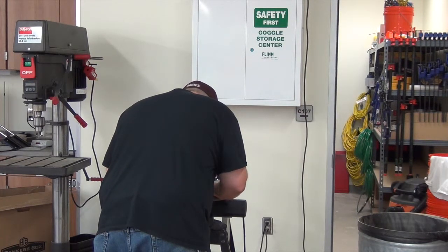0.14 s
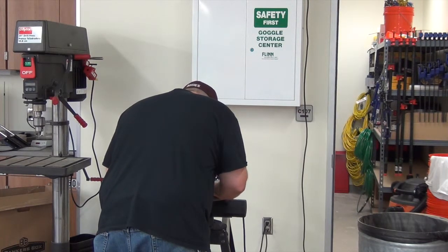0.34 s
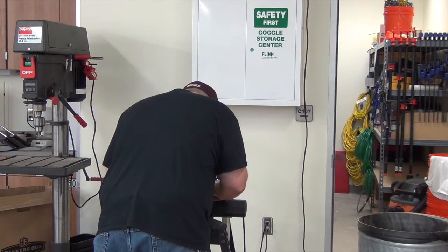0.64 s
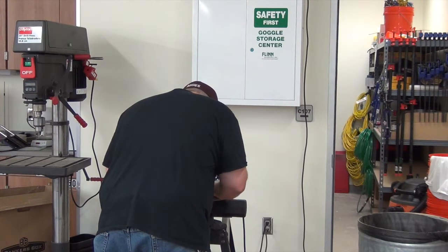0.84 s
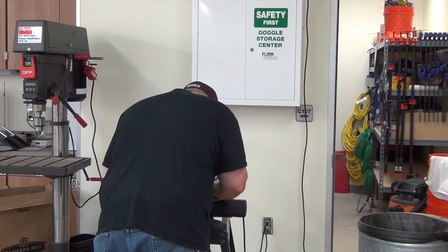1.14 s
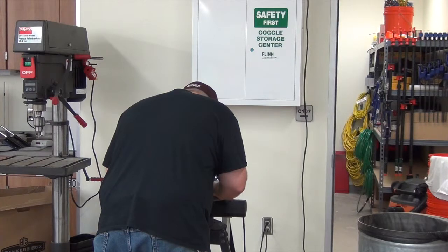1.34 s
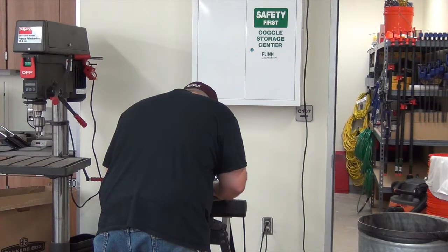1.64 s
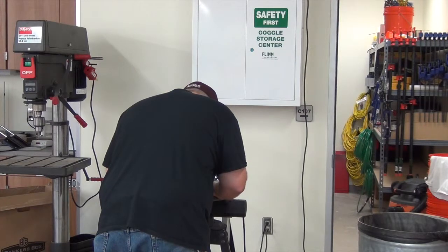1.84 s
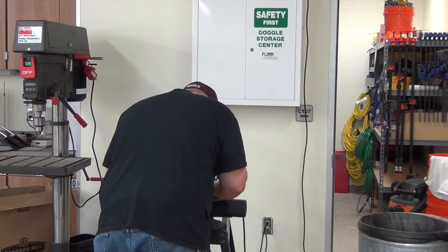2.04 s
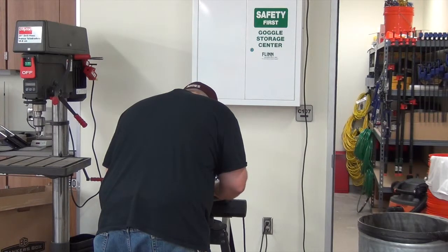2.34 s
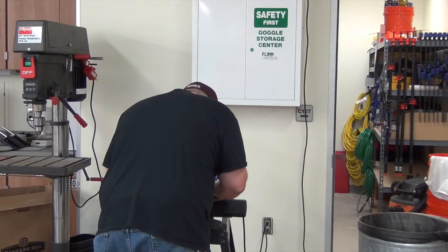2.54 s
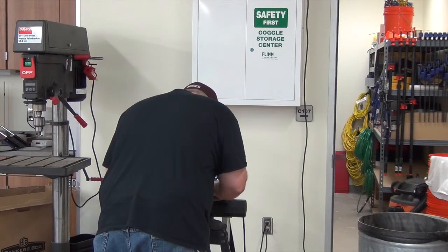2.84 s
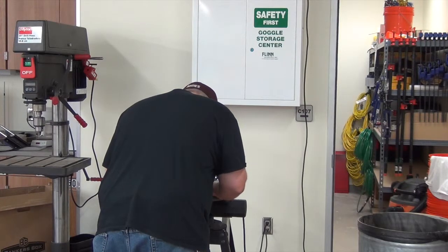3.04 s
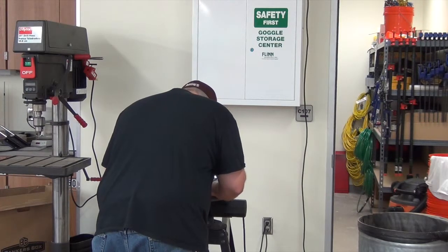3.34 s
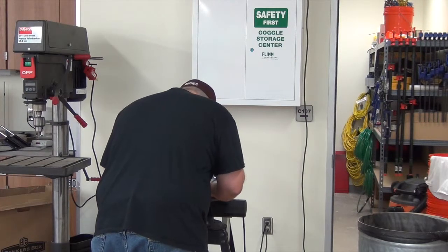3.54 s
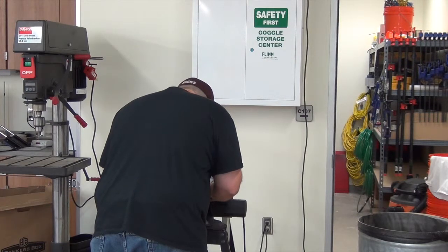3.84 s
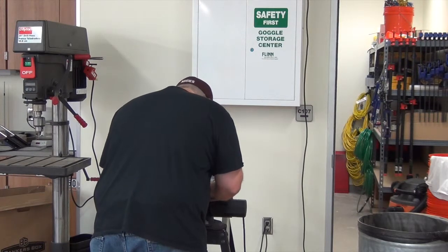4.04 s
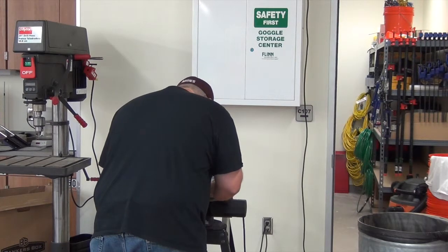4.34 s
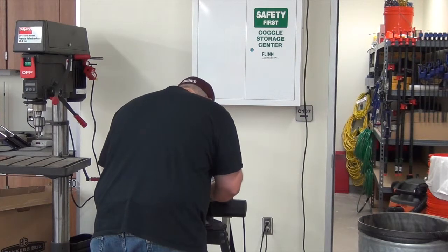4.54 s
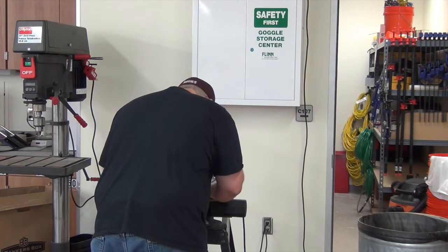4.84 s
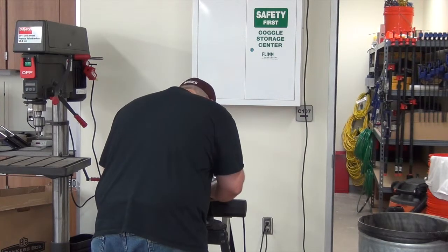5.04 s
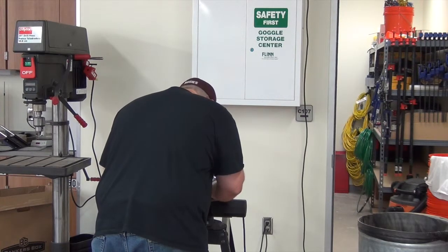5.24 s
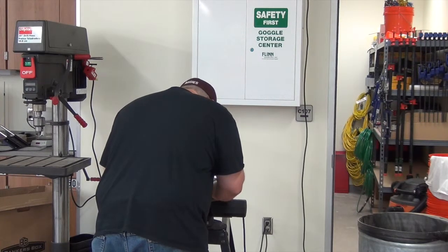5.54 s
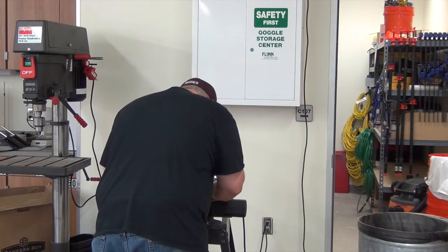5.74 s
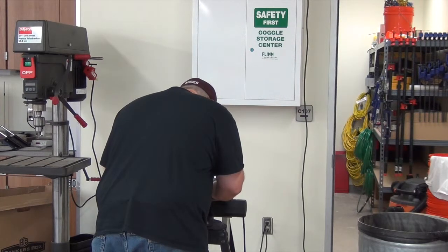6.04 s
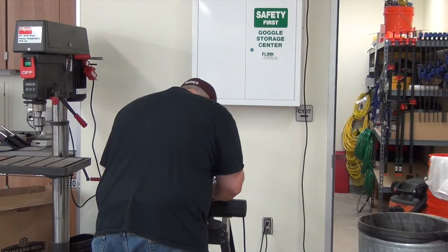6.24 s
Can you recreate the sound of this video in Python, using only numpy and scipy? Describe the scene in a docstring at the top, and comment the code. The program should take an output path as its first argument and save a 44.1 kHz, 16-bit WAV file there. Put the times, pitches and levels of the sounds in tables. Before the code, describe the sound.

A scroll saw rasps and squeaks through wood, runs free with a rattling hum, then bites into a harsher second cut.

```python
"""First you hear a scroll saw rasping through wood in a workshop, at about 24 strokes a second.
Its teeth click against the wood and set it ringing. The blade judders, squeaks and grabs the piece,
making it chatter on the table, then eases off and comes free. The motor hums and the linkage that
drives the blade rattles on alone, until the teeth bite into a second, harsher cut."""
import sys
import numpy as np
from scipy import signal
from scipy.fft import rfft, irfft, next_fast_len
from scipy.io import wavfile
from scipy.ndimage import uniform_filter1d, minimum_filter1d

SR = 44100
rng = np.random.default_rng(int(sys.argv[2]) if len(sys.argv) > 2 else 0)


def wav_out(sig):
    """Save sig, one row per channel (or a flat mono array), as 16-bit PCM at SR to the path in sys.argv[1]."""
    wavfile.write(sys.argv[1], SR, np.round(np.clip(np.atleast_2d(sig).T, -1, 1) * 32767).astype(np.int16))


N = 281358
TIME_S = np.arange(N) / SR
STROKES_PER_S = 24.2
FREE_S, BITE_S = 3.68, 5.338  # the first cut ends, the second begins
USUAL_FEED_DB, IDLE_FEED_DB = -28.5, -60.5  # feed is how hard the wood is pushed into the blade
CUT_PAN_DB, TABLE_PAN_DB = .6, 1.3  # how much louder on the left


def from_db(db):
    """Turn decibels into a gain to multiply by."""
    return 10 ** (np.asarray(db) / 20)

def rms(x):
    """The average strength of a sound (root mean square)."""
    return np.sqrt(np.mean(x ** 2) + 1e-20)

def in_time(rows):
    """Join timed points with straight lines, one curve per column."""
    times_s, *columns = np.transpose(rows)
    return [np.interp(TIME_S, times_s, column) for column in columns]

def spells(rows, attack_s, release_s):
    """A gain for events that build up, hold and die away."""
    gains = []
    for start_s, hold_s, db in rows:
        fade = np.minimum((TIME_S - start_s) / attack_s, (start_s + hold_s - TIME_S) / release_s)
        gains.append(from_db(db) * np.exp(np.clip(fade, -np.log(1e9), 0)))
    return np.max(gains, axis=0)

def follow(feed_db, usual_db, share):
    """A gain of usual_db at the usual feed, taking a share of every change in the feed."""
    return from_db(usual_db + share * (feed_db - USUAL_FEED_DB))

def band(x, low_hz, high_hz):
    """Keep the sound between two pitches."""
    return signal.sosfilt(signal.butter(4, [low_hz, high_hz], "band", fs=SR, output="sos"), x + 1e-18)

def coloured(x, points):
    """Shape a sound's lows and highs with a smooth curve; strength 1."""
    hz, db = np.transpose(points)
    size = next_fast_len(N + SR // 10)
    octave = np.log2(np.fft.rfftfreq(size, 1 / SR) + 1)
    bass_cut_db = np.minimum(octave - np.log2(hz[0]), 0) * 24
    gain = from_db(np.interp(octave, np.log2(hz), db) + bass_cut_db)
    y = irfft(rfft(x, size) * gain, size)[:N]
    return y / rms(y)

def resonate(x, modes):
    """Ring an object's natural notes (modes); narrow ones ring longer. Strength 1."""
    y = 0
    for k, (hz, width_hz, db) in enumerate(modes):
        r = np.exp(-np.pi * width_hz / SR)
        feedback = [1, -2 * r * np.cos(2 * np.pi * hz / SR), r * r]
        y = y + (-1) ** k * from_db(db) * (1 - r * r) * signal.lfilter([1, 0, -1], feedback, x + 1e-18)
    return y / rms(y)

def contacts(turns, angles, sizes, jitter_s=.00004):
    """Clicks at the same points of every crank turn, each a little early or late."""
    when = np.interp(np.arange(len(sizes))[:, None] + angles, turns, np.arange(N), -SR, -SR)
    at = np.round(when + jitter_s * SR * rng.standard_normal(when.shape)).astype(int)
    inside = (at >= 0) & (at < N)
    return np.bincount(at[inside], sizes[inside], N)

def rattle(turns, count, alike, spread_db, jitter_s=.00004):
    """Many small clicks a turn, whose sizes partly repeat from stroke to stroke; strength 1."""
    shape = (int(turns[-1]) + 2, count)
    sizes = np.sqrt(alike) * rng.choice([-1, 1], count) + np.sqrt(1 - alike) * rng.standard_normal(shape)
    angles = (np.arange(count) + rng.random(count)) / count - 1 / 2
    clicks = contacts(turns, angles, sizes * from_db(spread_db * rng.standard_normal(shape)), jitter_s)
    return clicks / rms(clicks)

def stroke(turns, swing_db, return_db, lag, uneven_db):
    """A gain that pulses once a stroke (swing) and twice a stroke (return); lag is in turns."""
    angle = 2 * np.pi * (turns - lag)
    count = int(turns[-1]) + 2
    grip = np.interp(turns - lag, np.arange(count), rng.standard_normal(count))
    gain = from_db(swing_db * np.cos(angle) + return_db * np.cos(2 * angle))
    power = uniform_filter1d(gain ** 2, int(SR / STROKES_PER_S))
    return gain / np.sqrt(power) * from_db(uneven_db * grip)

def workshop(x, pan_db, echo_db, fade_s=.27, width_db=-23):
    """The direct sound plus a dying swarm of echoes, nearly alike left and right."""
    t = np.arange(SR // 2) / SR
    tails = rng.standard_normal((2, len(t))) * from_db(-60 * t / fade_s) * (t > .003)
    common, apart = from_db(echo_db) * tails / np.sqrt(np.sum(tails[0] ** 2))
    response = common + (t == 0) + from_db(width_db) * apart * [[1], [-1]]
    y = signal.fftconvolve(x[None], response, axes=1)[:, :N]
    return y * rms(x) / rms(y) * from_db([[pan_db / 2], [-pan_db / 2]])

# The tone of the room's air: pitch_hz, relative_db
AIR_COLOUR = [(25, -26), (60, -23), (110, 3.5), (300, 7.5), (1000, -21), (4000, -16), (15000, -47)]
def room_air():
    """A faint, low rush of air lies under everything."""
    common, apart = [coloured(rng.standard_normal(N), AIR_COLOUR) for _ in range(2)]
    return from_db(-62.5) * (common + from_db(-9) * apart * [[1], [-1]])

# How far the crank runs ahead (below zero, behind): time_s, lead_turns
CRANK_LEAD = [(0, -.19), (.45, -.21), (1.1, -.11), (2, -.21), (3, -.14), (3.5, -.14), (4.2, -.24),
              (5, -.37), (6.05, -.42), (6.4, -.52)]
def crank_turns():
    """Count the crank's turns, one per stroke; its speed drifts with the load."""
    return STROKES_PER_S * TIME_S + in_time(CRANK_LEAD)[0]

# Tones of the motor and frame: pitch_hz, relative_db
HUM_TONES = [(120, -70), (240, -50.5), (360, -54), (433, -53.5), (599.3, -51.5), (864.5, -52)]
def motor_hum():
    """The motor and the frame hum on steady pitches."""
    hum = sum(from_db(db) * np.sin(2 * np.pi * (hz * TIME_S + rng.random())) for hz, db in HUM_TONES)
    return from_db(-3.5) * np.sqrt(2) * hum

# The tone of the linkage's rattle: pitch_hz, relative_db
LINKAGE_COLOUR = [(140, -42), (210, -9.5), (290, -11.5), (360, -6), (440, 0.5), (600, -2.5), (720, -4.5),
                  (880, -4), (1100, -9), (1450, -6.5), (1900, -9), (2700, -22), (3700, -26), (5500, -34.5),
                  (15000, -68)]
# The tone of the blade's swish: pitch_hz, relative_db
SWISH_COLOUR = [(3000, -23), (6000, -15), (8000, -2), (9800, 2), (11500, -12), (15000, -12)]
def moving_parts(turns):
    """On every turn the linkage rattles and the blade swishes through the table slot."""
    clicks = rattle(turns, count=70, alike=.62, spread_db=1, jitter_s=.00008)
    clicks *= stroke(turns, swing_db=1.8, return_db=.7, lag=.067, uneven_db=.7)
    swish = coloured(rng.standard_normal(N), SWISH_COLOUR)
    swish *= stroke(turns, swing_db=7, return_db=1, lag=-.02, uneven_db=2)
    return from_db(-44) * coloured(clicks, LINKAGE_COLOUR) + from_db(-76) * swish

# The blade catches the wood: start_s, hold_s, level_db
GRABS = [(0, 0.058, -19.5), (.2, 0.038, -23), (.39, 0.053, -20), (.665, 0.1, -12.5), (.985, 0.065, -7),
         (1.28, 0.095, -11), (2.44, 0.062, -31.5), (2.92, 0.1, -37), (5.88, 0.042, -23),
         (6.14, 0.14, -28.5)]
def grabbing():
    """How strongly the blade grabs and shakes the wood at each moment."""
    return spells(GRABS, attack_s=.035, release_s=.037)

# The saw table's ringing notes: pitch_hz, width_hz, relative_db
TABLE_MODES = [(534, 27.4, 4.5), (698, 28.5, -1), (792, 13, -13), (839.8, 34.5, -6.5), (895.7, 24.5, -2),
               (1352, 31, -19), (1606, 65, -18)]
def chatter(turns, grab, angle=-.29, bounce_turns=.47, bounce_db=-6):
    """Each stroke slaps the grabbed wood down; it bounces once, and the table honks."""
    sizes = from_db([0, bounce_db] + rng.standard_normal((int(turns[-1]) + 2, 2)))
    slaps = contacts(turns, np.array([angle, angle + bounce_turns]), sizes)
    knocks = resonate(slaps, [(863, 138.4, -10.5), (1480, 1150, -16.5)])
    return grab * resonate(knocks, TABLE_MODES)

# The first piece's upper notes: pitch_hz, width_hz, relative_db
FIRST_JUDDER_MODES = [(1182, 19, -5.5), (1198, 47, 2.5), (1400, 31, -5.5), (1540, 62, -5), (1697, 73, 0),
                      (1859, 52, 0.5)]
# The second piece's upper notes: pitch_hz, width_hz, relative_db
SECOND_JUDDER_MODES = [(1200, 45, 0), (1310, 50, -4), (1398, 35, 0), (2130, 30, -8), (3375, 35, -3),
                       (3508, 35, -4)]
# The cut is tight around the blade: start_s, hold_s, level_db
JUDDERS = [(0, 0.048, -10.5), (.12, 0.12, -10.5), (.29, .04, -15), (.54, .06, -23.5), (.95, 0.056, -22.5),
           (5.485, 0.062, -16), (5.66, 0.014, -21), (5.94, .15, -21.5), (6.2, 0.14, -15.5)]
def judder(turns):
    """The blade sticks and slips on the way down, making the wood cry out."""
    cries = []
    for modes, swing_db, lag in [(FIRST_JUDDER_MODES, 6.5, -.12), (SECOND_JUDDER_MODES, 2.5, -.024)]:
        slips = rattle(turns, count=60, alike=.19, spread_db=-1.5)
        slips *= stroke(turns, swing_db, return_db=-.5, lag=lag, uneven_db=1.5)
        cries.append(resonate(slips, modes))
    return np.where(TIME_S < BITE_S, *cries) * spells(JUDDERS, attack_s=.04, release_s=.058)

def sing(notes, length_s, bend_share, rough, flutter_db=3):
    """Short rubbing tones that swell, slide a little and stop; passing teeth roughen them."""
    progress = np.linspace(0, 1, int(length_s * SR))
    swell = np.sin(np.pi * progress)
    out = np.zeros(N + len(progress))
    for start_s, hz, db in notes:
        wobble, flutter = (np.interp(progress, np.linspace(0, 1, 24), row)
                           for row in rng.standard_normal((2, 24)))
        pitch_hz = hz * (1 + bend_share * rng.standard_normal() * (progress - .5) + rough * wobble)
        tone = np.sin(2 * np.pi * np.cumsum(pitch_hz) / SR)
        at = int(np.clip(start_s * SR, 0, N))
        out[at:at + len(tone)] += from_db(db + flutter_db * flutter) * swell * tone
    return out[:N]

# Single squeaks: start_s, pitch_hz, level_db
SQUEAKS = [(.322, 1750, -12), (.362, 1715, -14), (.485, 4000, -24), (.53, 1726, -13), (.57, 4000, -22.5),
           (.61, 4000, -23.5), (.614, 1800, -17), (.654, 4010, -17), (.654, 1768, -9.5),
           (.758, 3700, -21.5), (.776, 1707, -17), (.778, 2725, -16.5), (.82, 2830, -22),
           (.862, 4010, -19.5), (.862, 1720, -13.5), (.866, 2840, -21), (.902, 3450, -28),
           (.946, 1714, -11.5), (1.188, 4010, -25.5), (1.852, 3930, -33), (1.895, 3980, -36),
           (2.02, 3970, -32.5), (2.23, 3994, -30.5), (3.12, 2800, -31.5), (3.22, 3990, -39)]
def squeaking():
    """Blade and wood squeak briefly against each other."""
    return sing(SQUEAKS, length_s=.023, bend_share=.025, rough=.022)

# The blade leans on the side of the cut: start_s, hold_s, boost_db
RUBS = [(0, 0.46, 16), (1.55, .19, 13), (1.9, .39, 14), (5.39, .06, -1)]
def rubbing():
    """Sideways rubbing brings out the chirps and hiss; this gain never falls below 1."""
    return np.maximum(spells(RUBS, attack_s=.066, release_s=.05), 1)

def chirps(turns, gain, hz, octaves, angle, length_s, rough, count):
    """A few short notes a stroke, scattered around one blade note; wider scatter reaches lower."""
    strokes = int(turns[-1]) + 1
    angles = np.arange(strokes)[:, None] + angle + .09 * rng.standard_normal((strokes, count))
    at = np.searchsorted(turns, angles.ravel()).clip(0, N - 1)
    octaves = np.broadcast_to(octaves, N)[at]
    pitch_draw, level_draw = rng.standard_normal((2, len(at)))
    offset = np.clip(octaves * pitch_draw - 1.7 * octaves ** 2, -1.7, .5)
    level_db = 20 * np.log10(gain[at] + 1e-9) - 9.1 * offset + 3 * level_draw
    return sing(zip(at / SR, hz * 2 ** offset, level_db), length_s, bend_share=.018, rough=rough)

def singing_blade(turns, feed_db, rub):
    """High chirps scatter wider with more feed; in the second cut a squeal replaces the lower ones."""
    scatter = np.clip(.07 * (feed_db + 35), .075, .62)
    high = chirps(turns, follow(feed_db, usual_db=-62, share=.78) * rub,
                  hz=10630, octaves=scatter, angle=-.22, length_s=.0148, rough=.0028, count=9)
    middle = chirps(turns, follow(feed_db, usual_db=-39, share=1.23),
                    hz=5456, octaves=.42, angle=-.2, length_s=.017, rough=.0029, count=5)
    low = chirps(turns, follow(feed_db, usual_db=-42.5, share=.9),
                 hz=4020, octaves=.02, angle=-.27, length_s=.022, rough=.012, count=2)
    squeal = chirps(turns, follow(feed_db, usual_db=-33, share=.4),
                    hz=3540, octaves=.02, angle=-.32, length_s=.0214, rough=.0069, count=2)
    return high + np.where(TIME_S > BITE_S, squeal, middle + low)

def bite():
    """The first teeth catch the edge and set the second piece ringing."""
    age_s = TIME_S - BITE_S
    scrape = rng.standard_normal(N) * np.maximum(age_s, 0) * np.exp(-np.abs(age_s) / .0032)
    ring = resonate(scrape, [(2020, 130, -7), (2900, 28, 0), (3700, 80, -5), (4470, 46, -10)])
    return from_db(-26) * ring / np.max(np.abs(ring))

# The push on the first piece, as the level of its rasp: time_s, feed_db
FIRST_FEED = [(0, -20), (.42, -27), (1.0, -29.5), (1.8, -36), (2.4, -36.5), (2.72, -39), (3.16, -37.5),
              (3.29, -49), (3.44, -50), (3.56, -64.5)]
# The push on the second piece, and the downstroke's extra level: time_s, feed_db, swing_db
SECOND_FEED = [(5.376, -27, 4.5), (5.6, -22.5, 3.5), (5.92, -19.5, 1.6), (6.14, -13.5, 2.5),
               (6.37, -16, 7.5)]
def feeding():
    """How hard the wood is pushed at each moment, and how deeply the second cut pulses."""
    first_db, = in_time(FIRST_FEED)
    second_db, swing_db = in_time(SECOND_FEED)
    return np.select([TIME_S < FREE_S, TIME_S < BITE_S], [first_db, IDLE_FEED_DB], second_db), swing_db

def tooth_sounds(teeth, modes, colour, modes_db):
    """Tooth clicks shake blade and wood, giving a ring, a rasp and a hiss, each of strength 1."""
    sound = coloured(teeth, colour) + from_db(modes_db) * resonate(teeth, modes)
    parts = [band(sound, 200, 2000), band(sound, 2000, 7800), band(sound, 7800, 17000)]
    return [part / rms(part) for part in parts]

# Ringing notes of the blade and first piece: pitch_hz, width_hz, relative_db
FIRST_MODES = [(619, 25, -3.5), (695, 8.7, 0), (896, 85, 2), (1368, 157, 6), (1726, 37, -2), (2226, 41, 1),
               (2830, 67, -9.5), (3300, 81, -2.5), (3600, 52, -9.5), (3990, 78, -3)]
# The first cut's overall tone: pitch_hz, relative_db
FIRST_COLOUR = [(260, -54), (350, -6.5), (544, -8), (826, 3), (1000, -8), (1430, 9), (1940, -9.5),
                (4070, -14.5), (5400, -21), (7000, -22), (8300, -31.5), (10900, -24.5), (15500, -39)]
def first_cut(turns, feed_db, rub, grab):
    """The teeth rasp until the blade comes free; feed deepens the pulse, a grab adds ring."""
    swing_db = np.maximum(3.5 + .14 * (feed_db - USUAL_FEED_DB), 0)
    teeth = rattle(turns, count=220, alike=.46, spread_db=.5)
    ring, rasp, hiss = tooth_sounds(teeth, FIRST_MODES, FIRST_COLOUR, modes_db=-4)
    ring *= np.hypot(follow(feed_db, usual_db=-25, share=.85), from_db(-2) * grab ** 2)
    ring *= stroke(turns, .52 * swing_db, return_db=-1.5, lag=-.0074, uneven_db=1.5)
    rasp *= from_db(feed_db) * stroke(turns, .65 * swing_db, return_db=1.5, lag=-.21, uneven_db=1.32)
    hiss *= follow(feed_db, usual_db=-49.5, share=.79) * rub ** .22
    hiss *= stroke(turns, 1.5 * swing_db, return_db=4, lag=-.0091, uneven_db=.6)
    return (ring + rasp + hiss) * np.clip((FREE_S - TIME_S) / .093, 0, 1)

# Ringing notes of the blade and second piece: pitch_hz, width_hz, relative_db
SECOND_MODES = [(1377, 41, 1), (1750, 19, 6), (1985, 45, -4.5), (2230, 44, 5.5), (2590, 6.4, -34),
                (3394, 62, -1), (4420, 125, -9), (4540, 28, -4), (4836, 81, -8), (7440, 39, -10)]
# The second cut's overall tone: pitch_hz, relative_db
SECOND_COLOUR = [(240, -25), (330, -23.5), (660, -14.5), (867, -9.5), (1040, -14), (1360, -2),
                 (1880, -12.5), (2320, -3), (3150, -10.5), (3410, -11.5), (5530, -20.5), (7500, -24),
                 (15500, -42)]
def second_cut(turns, feed_db, swing_db):
    """The teeth catch all at once with a bright tear; the wood's ring builds as the blade sinks in."""
    age_s = np.maximum(TIME_S - BITE_S, 0)
    teeth = rattle(turns, count=170, alike=.33, spread_db=1.5)
    ring, rasp, hiss = tooth_sounds(teeth, SECOND_MODES, SECOND_COLOUR, modes_db=-3)
    ring *= follow(feed_db, usual_db=-29, share=.78) * (1 - np.exp(-(age_s / .071) ** 2))
    ring *= stroke(turns, .57 * swing_db, return_db=-.5, lag=.025, uneven_db=1.3)
    hiss *= follow(feed_db, usual_db=-41, share=.67) * (1 + from_db(4) * np.exp(-age_s / .0073))
    edge = (rasp * from_db(feed_db) + hiss) * stroke(turns, swing_db, return_db=.5, lag=.03, uneven_db=.7)
    return (ring + edge) * np.clip(age_s / .0074, 0, 1)

def scene():
    """The sawing follows the crank and the feed, over steady hum and air."""
    turns, grab, rub = crank_turns(), grabbing(), rubbing()
    feed_db, swing_db = feeding()
    cutting = first_cut(turns, feed_db, rub, grab) + bite() + second_cut(turns, feed_db, swing_db)
    cries = judder(turns)
    squeaks = squeaking()
    air = room_air()
    blade = workshop(cutting + cries, CUT_PAN_DB, echo_db=-4)
    blade += workshop(squeaks + singing_blade(turns, feed_db, rub), CUT_PAN_DB, echo_db=-17.5)
    table = workshop(chatter(turns, grab), TABLE_PAN_DB, echo_db=0)
    machine = motor_hum() + workshop(moving_parts(turns), TABLE_PAN_DB, echo_db=-1)
    return air + machine + table + blade

def record(dry, lean_hz=1100, lean_share=.052, top_hz=15650):
    """The lows lean left, each side's loudest peaks are held down, and the highest treble is cut."""
    lows = signal.sosfilt(signal.butter(1, lean_hz, fs=SR, output="sos"), dry)
    sound = dry + lean_share * lows * [[1], [-1]]
    window = int(.0025 * SR)
    safe_gain = 1 / np.maximum(np.abs(sound), 1)
    limited = sound * uniform_filter1d(minimum_filter1d(safe_gain, window), window)
    return signal.sosfilt(signal.ellip(12, .1, 80, top_hz, fs=SR, output="sos"), limited)

dry = scene()
out = record(dry)
wav_out(out)
```